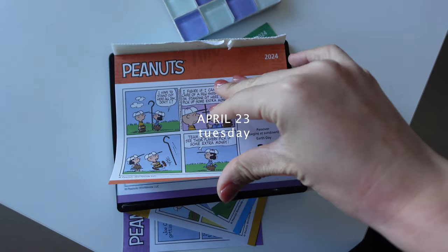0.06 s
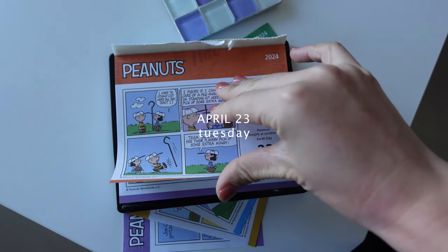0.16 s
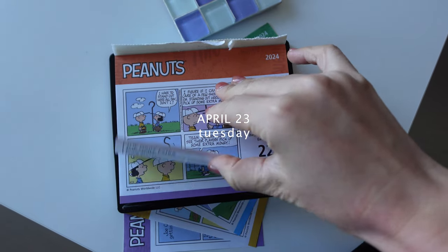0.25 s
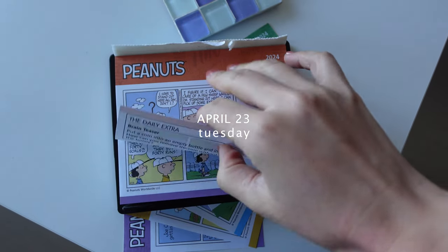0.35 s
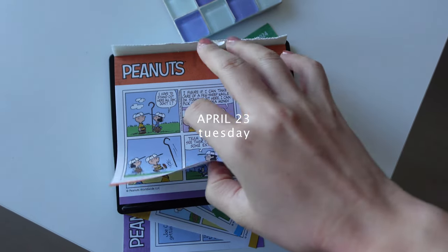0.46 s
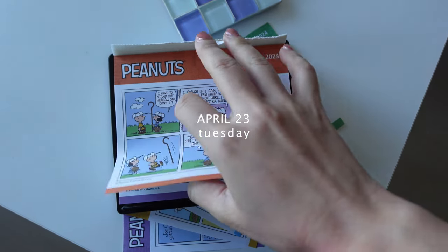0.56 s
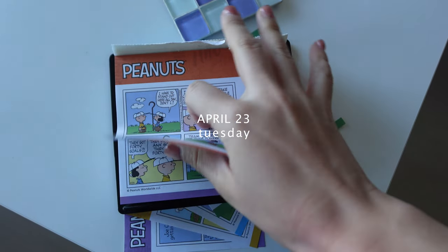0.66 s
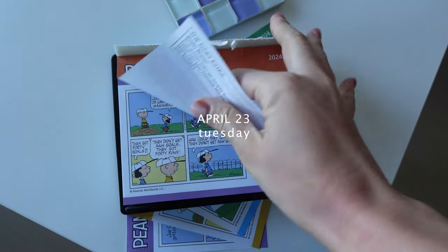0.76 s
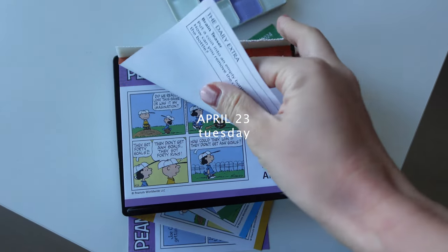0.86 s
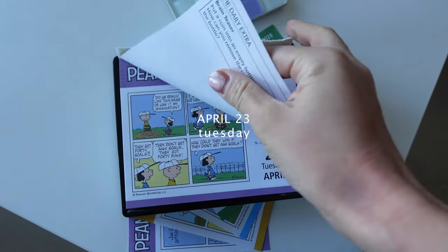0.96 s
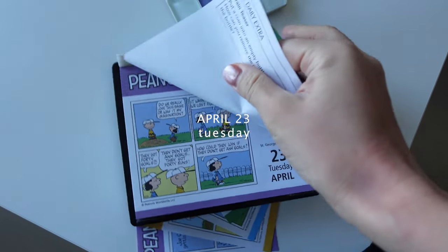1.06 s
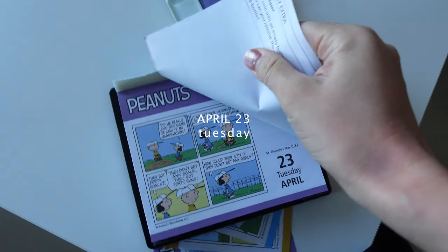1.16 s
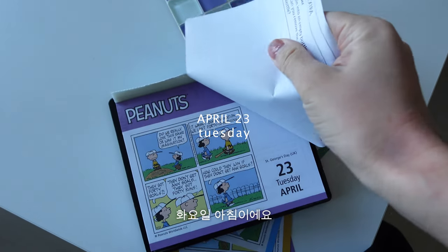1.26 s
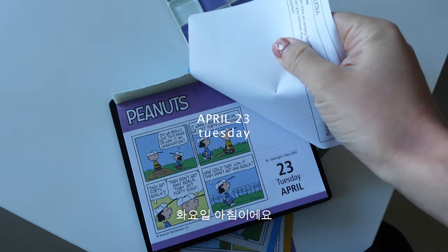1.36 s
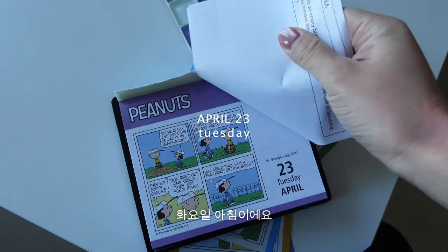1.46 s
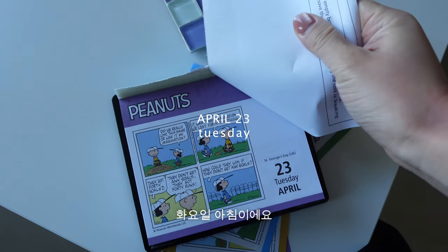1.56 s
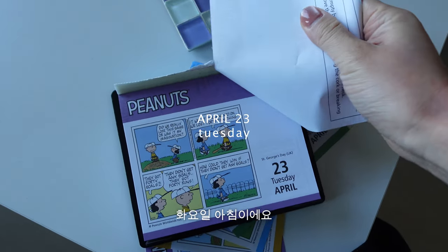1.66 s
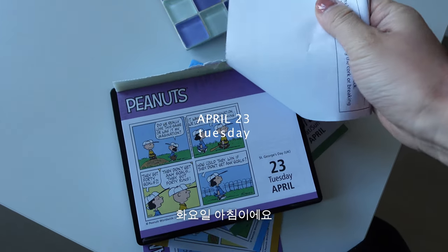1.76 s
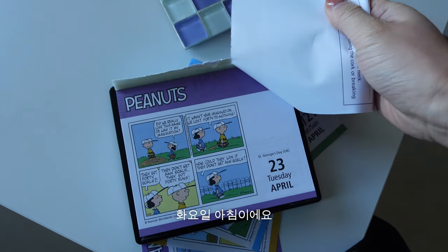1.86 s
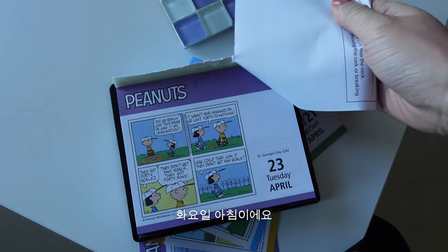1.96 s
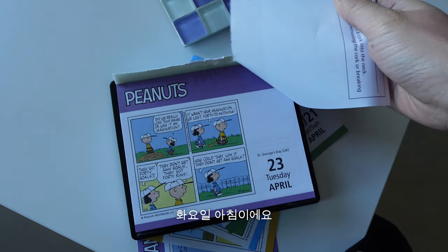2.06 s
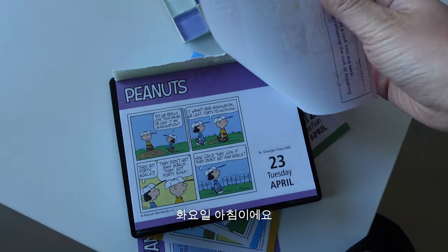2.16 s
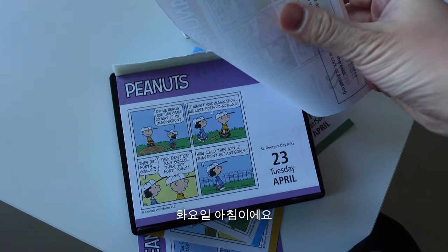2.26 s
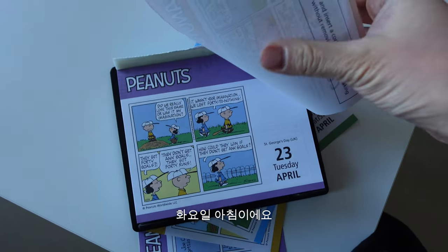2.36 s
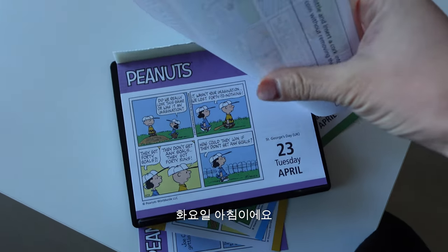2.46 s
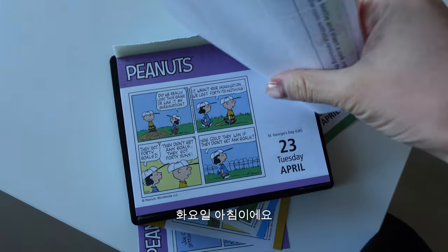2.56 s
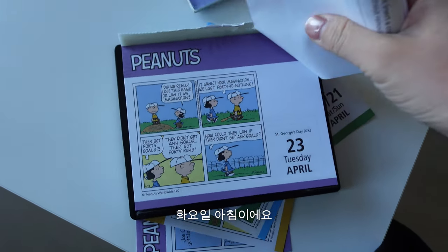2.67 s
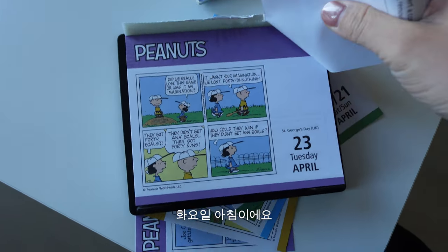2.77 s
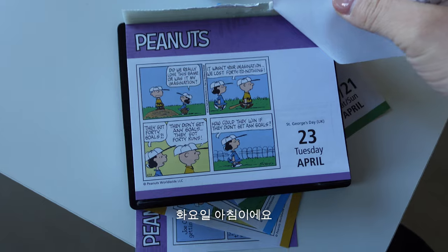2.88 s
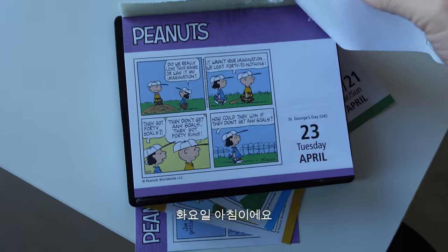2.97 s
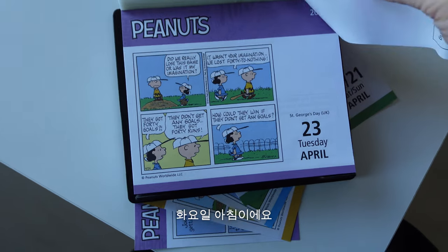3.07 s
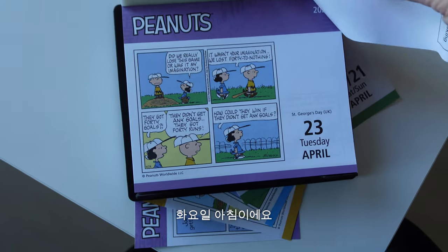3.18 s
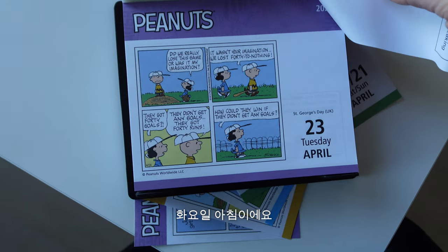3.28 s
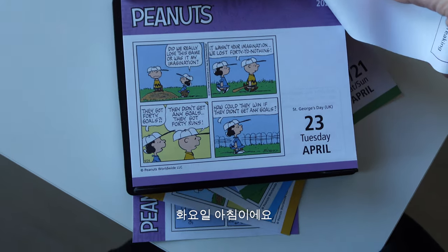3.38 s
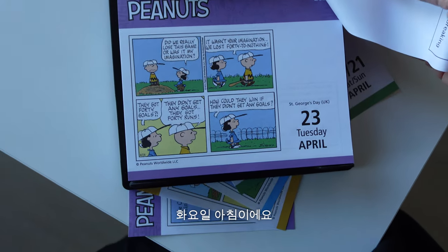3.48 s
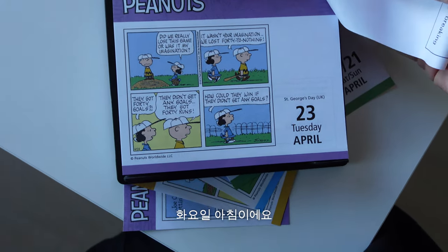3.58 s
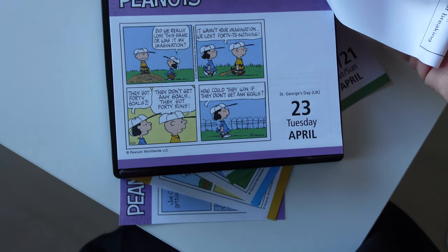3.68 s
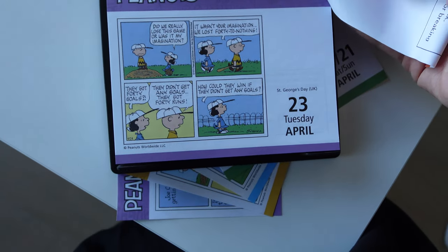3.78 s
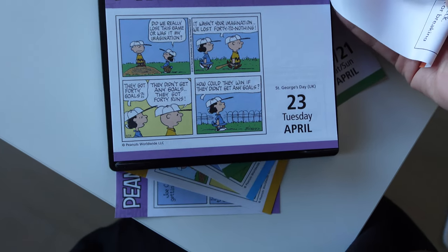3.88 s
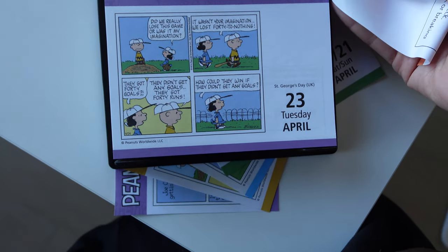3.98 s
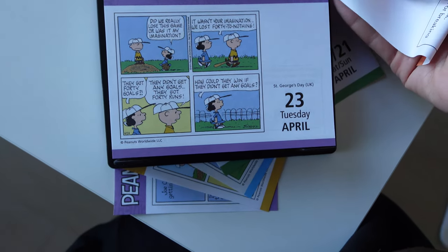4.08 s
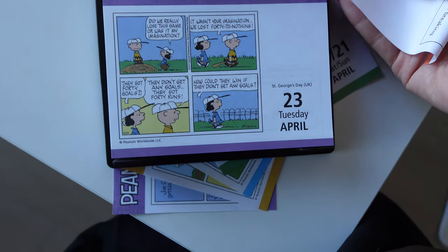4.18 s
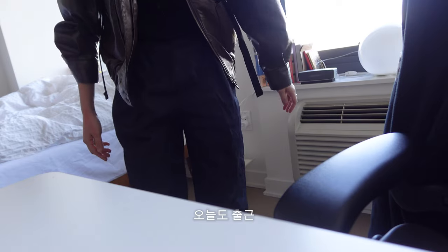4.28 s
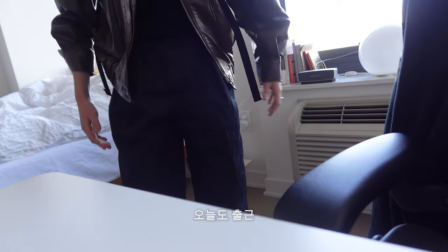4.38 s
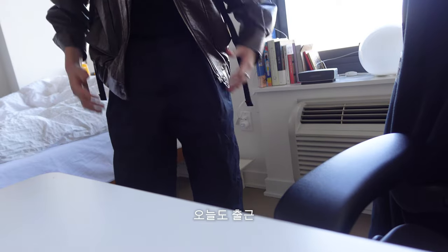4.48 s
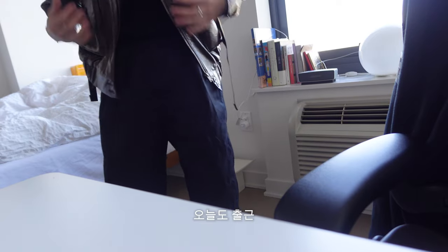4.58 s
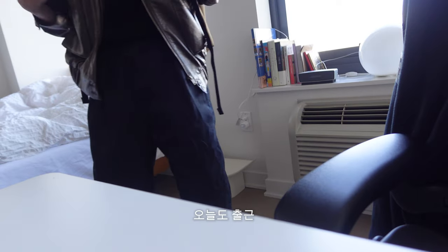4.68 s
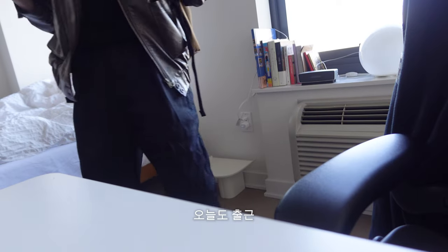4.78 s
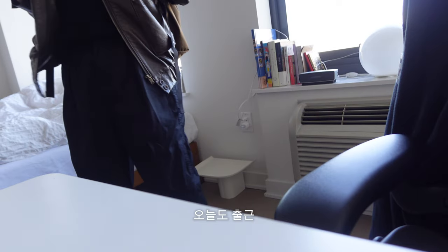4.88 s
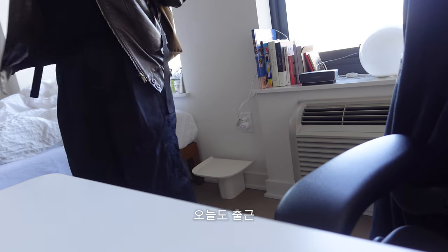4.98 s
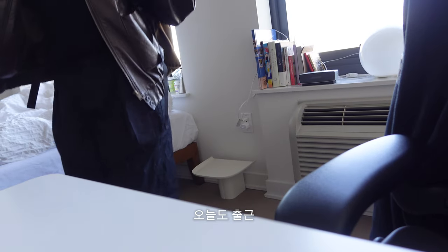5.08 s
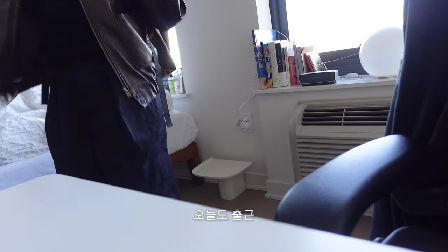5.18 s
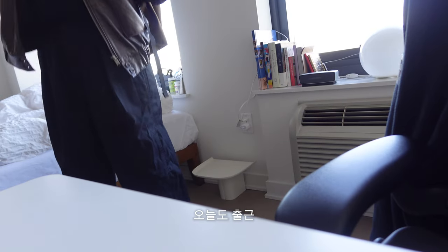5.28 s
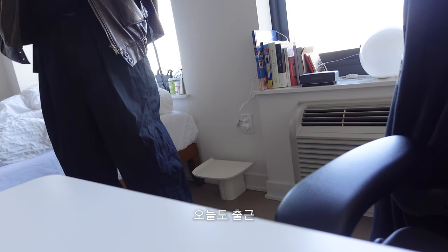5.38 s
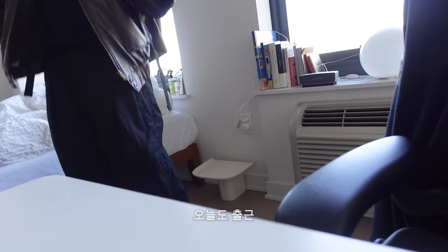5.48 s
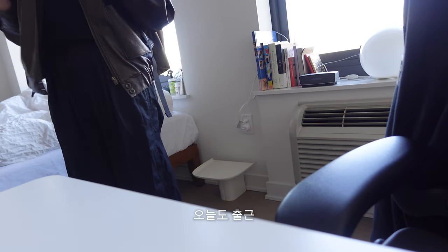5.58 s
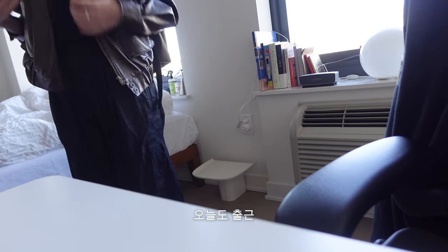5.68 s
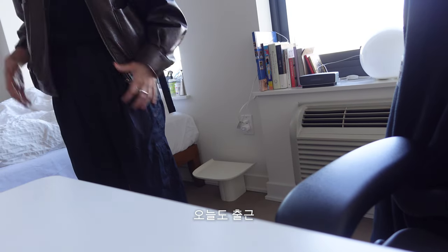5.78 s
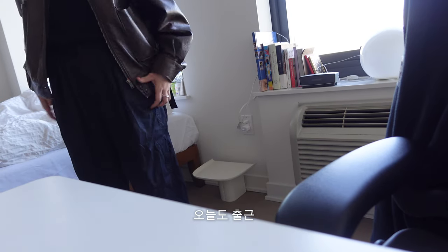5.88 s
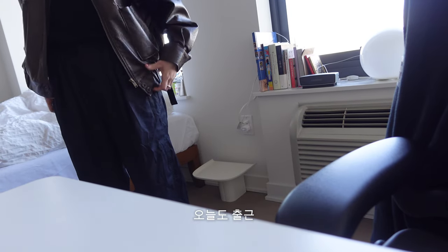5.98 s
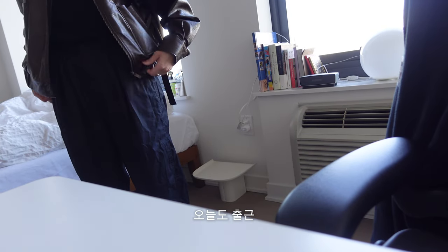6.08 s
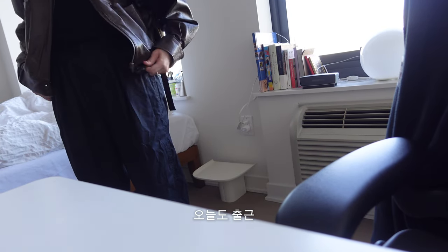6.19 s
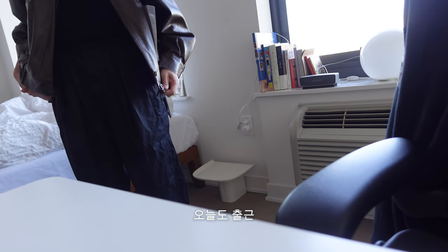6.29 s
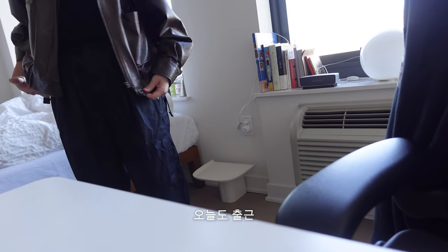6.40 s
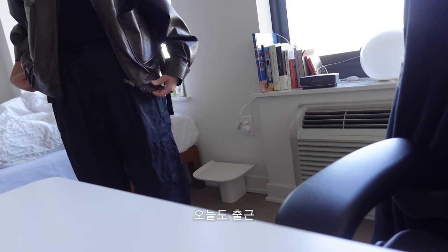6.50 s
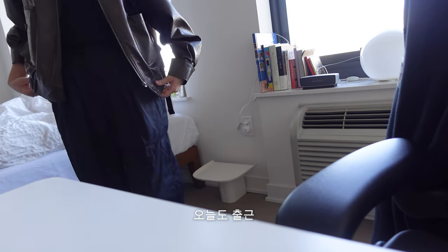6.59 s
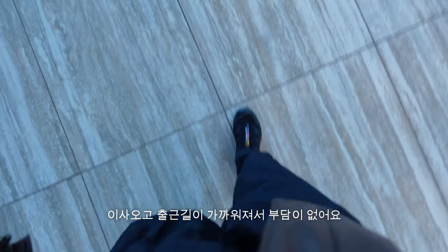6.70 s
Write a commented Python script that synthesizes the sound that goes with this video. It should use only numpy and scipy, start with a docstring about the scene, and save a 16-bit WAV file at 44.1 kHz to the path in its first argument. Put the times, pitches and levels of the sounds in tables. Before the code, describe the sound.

Very close and fairly dry, a paper page shifts softly from 0 s, with faint fingertip skids around 0.4-0.5 s. It buckles with a strong snap near 0.8 s, then tears off in a bright, grainy rip at about 1.1-1.3 s. Dense crinkles and papery pops follow from 1.5 to 2.1 s, more snaps around 2.6 and 2.9 s, then lighter rustling and crackle until two sharp, loud snaps at 4.2 s. At 4.25 s it cuts abruptly to a much quieter small room: a leather jacket rustles softly a few steps away, with small crease pops. Around 5.6 s it flaps once, with dull low bumps. Thin, high metallic zip-pull ticks come near 5.5 and 5.9 s and cluster at 6.2-6.5 s, with one more at 6.68 s. Faint air runs throughout. At 6.7 s a louder steady rush with a low tone and thin whistle suddenly begins.

```python
"""A page is lifted and torn off a desk calendar close by: the sheet buckles in snaps and slides as grainy noise,
fingertips skid, rubbed paper and tear hiss are band-passed friction, and fibres break in grainy rips.
Then, abruptly, farther off in a small room, someone shifts about in a leather jacket: it rustles, creases pop,
it flaps once amid dull bumps, and its zip pull ticks as clicked ringing modes.
At the very end a louder rush of noise with a low tone and a thin whistle sets in; faint air lies under it all."""
import sys
import numpy as np
from scipy import signal
from scipy.io import wavfile
from scipy.ndimage import uniform_filter1d, minimum_filter1d

SR = 44100
rng = np.random.default_rng(int(sys.argv[2]) if len(sys.argv) > 2 else 0)


def bounce(signal):
    """Save signal as a 16-bit WAV file at the path given by the first command-line argument."""
    frames = np.transpose(np.atleast_2d(signal))
    limited = np.clip(frames, -1, 1)
    pcm = np.round(limited * 32767).astype(np.int16)
    wavfile.write(sys.argv[1], SR, pcm)


N = 297234
TIME = np.arange(N) / SR
JACKET_START_S, RUSH_START_S = 4.252, 6.703


def from_db(db):
    """Decibels to gain."""
    return 10 ** (np.asarray(db) / 20)


def rms_one(x):
    """Scale to rms 1."""
    return x / np.sqrt(np.mean(x ** 2) + 1e-20)


def unit_energy(x):
    """Scale to a sum of squares of 1."""
    return x / np.sqrt(np.sum(x ** 2))


def in_time(rows):
    """Each column of a curve at every sample."""
    s, *columns = np.transpose(rows)
    return [np.interp(TIME, s, c) for c in columns]


def at_hz(points, hz):
    """Read a spectrum on a log-frequency axis."""
    points_hz, values = np.transpose(points)
    return np.interp(np.log(hz), np.log(points_hz), values)


def butter(x, hz, kind, order=2):
    """Causal Butterworth filter."""
    edges_hz = np.clip(hz, 10, .48 * SR)
    sos = signal.butter(order, edges_hz, kind, fs=SR, output="sos")
    return signal.sosfilt(sos, x + 1e-18)


def drift(rate_hz):
    """Smooth chance with spread near 1, a new random target rate_hz times a second."""
    knots = rng.standard_normal(4000)
    return np.interp(TIME * rate_hz, np.arange(len(knots)), knots) * np.sqrt(3 / 2)


def ring(x, hz, t60_s):
    """Damped resonator: a unit click sets a decaying sine of height 1 ringing."""
    r = from_db(-60 / (t60_s * SR))
    w = 2 * np.pi * hz / SR
    return signal.lfilter([0, np.sin(w)], [1, -2 * r * np.cos(w), r * r], x + 1e-18)


def add(out, s, sound):
    """Mix a short sound in at time s."""
    i = int(s * SR)
    out[..., i:i + sound.shape[-1]] += sound[..., :N - i]


def grain_envelope(per_s, spread_db, grain_s, grainy):
    """Tiny fractures at random, of uneven size, each dying fast, over a smooth share; rms near 1."""
    sizes = from_db(spread_db * np.minimum(rng.exponential(1, N), 3.5))
    hits = (rng.random(N) < per_s / SR) * sizes ** 2
    energy = signal.lfilter([1], [1, -np.exp(-2 / (grain_s * SR))], hits)
    share = np.clip(grainy, 0, 1)
    return np.sqrt(1 - share + share * energy / energy.mean())


def bands(spectrum, drive, patchy_db, patchy_hz):
    """Driven stereo noise as a list of (Hz, band); each band wanders in level; total rms 1."""
    # left-right correlation: (frequency [Hz], correlation [-1..1])
    likeness = [(100, 1), (500, 0.94), (2000, 0.97), (8000, 0.97), (16000, 0.97)]
    edges_hz = np.geomspace(25, 17000, 27)
    white = rng.standard_normal((2, 2, N)) * drive
    out = []
    for k, (low, high) in enumerate(zip(edges_hz, edges_hz[1:])):
        hz = np.sqrt(low * high)
        if high < spectrum[0][0] or low > spectrum[-1][0]:
            continue
        mid, side = butter(white[k % 2], [low, high], "band")
        alike = np.clip(at_hz(likeness, hz), 0, 1)
        gain = from_db(at_hz(spectrum, hz) + patchy_db * drift(patchy_hz))
        stereo = np.sqrt(1 + alike) * mid + np.sqrt(1 - alike) * side * [[1], [-1]]
        out.append((hz, gain * stereo))
    total = np.sqrt(sum(np.mean(band ** 2) for hz, band in out))
    return [(hz, band / total) for hz, band in out]


def steady(spectrum):
    """Even noise of one colour; rms 1."""
    return sum(band for hz, band in bands(spectrum, 1, 0, 1))


def swells(rows):
    """Each move rises at 20 dB per attack, holds, sinks at 20 dB per release: dB of body, middle, top."""
    power = np.full((3, N), 1e-12)
    for s, attack_s, hold_s, release_s, db, body_db, top_db in rows:
        away = np.maximum(s - TIME, 0) / attack_s + np.maximum(TIME - s - hold_s, 0) / release_s
        shape = from_db(db - 20 * np.minimum(away, 10))
        power += np.outer(from_db([body_db, 0, top_db]) ** 2, shape ** 2)
    return 10 * np.log10(power)


def rustle(levels_db, spectrum, drive, patchy_db, patchy_hz):
    """Grainy friction noise whose body, middle and top swell as the surface bends."""
    body_db, middle_db, top_db = levels_db
    parts = bands(spectrum, drive, patchy_db, patchy_hz)
    swell_db = []
    for low, high, db in ((0, 2000, body_db), (2000, 7000, middle_db), (7000, SR, top_db)):
        power = sum(np.mean(band ** 2) for hz, band in parts if low <= hz < high)
        swell_db.append(db - 10 * np.log10(power))
    swell_db = np.array(swell_db)
    centres = np.log([1400, 3500, 9500])

    def blend(hz):
        """Crossfade weights of the three ranges."""
        return np.array([np.interp(np.log(hz), centres, w) for w in np.eye(3)])

    return sum(band * from_db(blend(hz) @ swell_db) for hz, band in parts)


def buckles(rows, ring_cycles, crack_s, after_s, pop_db, crack_db, after_db, low_cut_hz):
    """A fold flips: a damped pop, a bright crack and a short crackle as the sheet settles."""
    out, t = np.zeros((2, N)), np.arange(SR // 16) / SR
    pop_samples, settle_samples = SR / 400, SR / 200
    for s, db, hz, crack, after in rows:
        noise = rng.standard_normal((4, len(t)))
        flip = (t == 0) + .06 * noise[3] * np.exp(-t / .0009)
        pitches = hz * np.array([.66, .98, 1.38]) * np.exp(rng.normal(0, .05, 3))
        modes = sum((-1) ** k * ring(flip, f, ring_cycles / f) for k, f in enumerate(pitches))
        # small folds radiate no bass
        pop = unit_energy(butter(modes, max(low_cut_hz, 0.22 * hz), "high", order=4))
        snap = unit_energy(butter(noise[0] * np.exp(-t / crack_s), [4800, 10500], "band"))
        crackle = noise[1:3] * (1 - np.exp(-t / 0.0014)) * np.exp(-t / after_s)
        settle = butter(crackle, [hz * 0.42, hz * 1.38], "band", order=1)
        mid, side = map(unit_energy, butter(settle, low_cut_hz, "high", order=4))
        direct = np.sqrt(pop_samples) * (from_db(pop_db) * pop + from_db(crack + crack_db) * snap)
        spread = mid + 0.19 * side * [[1], [-1]]
        tail = np.sqrt(settle_samples) * from_db(after + after_db) * spread
        add(out, s, from_db(db) * (direct + tail))
    return out


def room(x, t60_s, dull_hz):
    """Diffuse reflections, different at each ear, after a short gap."""
    t = np.arange(SR // 2) / SR
    noise = rng.standard_normal((2, len(t))) * from_db(-60 * t / t60_s) * (t > .004)
    tail = butter(noise, dull_hz, "low", order=1)
    return signal.fftconvolve(x, tail / np.sqrt(np.sum(tail ** 2) / 2), axes=1)[:, :N]


def air():
    """Faint steady noise of the room air."""
    # spectrum: (frequency [Hz], relative density [dB per Hz])
    air_spectrum = [(15, -63), (25, -55), (97, -21), (149, -19), (206, -7.5), (293, -3.5), (373, 0),
                    (560, -33), (818, -13), (1230, -10), (2110, -6.5), (4490, -9), (6920, -17.5),
                    (14000, -16.5), (16000, -15)]
    return from_db(-58.0) * steady(air_spectrum)


def small_snaps(slide_db, crispness, count=200):
    """Little folds flip at random, oftener in a crisp sheet and louder in a brisk slide."""
    per_s = 43  # in a fully crisp sheet
    chance, scatter = rng.random((count, 2)), rng.standard_normal((count, 2))
    rows = []
    for (when, luck), (size, pitch) in zip(chance, scatter):
        i = int(when * JACKET_START_S * SR)
        if luck < per_s * crispness[i] * JACKET_START_S / count:
            db = slide_db[i] + 1 + 3.5 * size
            hz = 5000 * 2 ** (0.18 * pitch)
            rows.append((i / SR, db, hz, 2))
    return rows


def with_cracks(rows):
    """A smaller, higher fold cracks more brightly: crack level rises with pitch."""
    fold_hz, crack_db, crack_db_per_octave = 3000, -11.5, 15
    return [(s, db, hz, crack_db + crack_db_per_octave * np.log2(hz / fold_hz), after)
            for s, db, hz, after in rows]


def snaps(slide_db, crispness):
    """The sheet's big folds and chance small ones flip over and snap."""
    # big buckles: (time [s], level [dB], pitch [Hz], relative after-crackle [dB])
    big_snaps = [(.098, -32, 4000, -6), (0.306, -31, 3000, -3), (.669, -19.5, 3170, 0),
                 (.736, -29.5, 3720, -12), (.771, -11, 3740, -3), (1.101, -16, 3660, 4),
                 (1.302, -27, 4800, -13), (1.43, -30.5, 3830, -4), (1.538, -21, 4300, -9),
                 (1.585, -15, 4400, 1), (1.606, -15.5, 2430, -22), (1.624, -17.5, 2330, -13),
                 (1.74, -16, 2470, -4), (1.75, -23, 3100, 7), (1.773, -24, 2200, -8),
                 (1.82, -16, 3600, -14), (1.842, -15, 2120, -2), (1.908, -18, 2600, -14),
                 (1.917, -18, 1920, -24), (1.926, -14, 2020, -14), (1.951, -14, 1980, -17),
                 (1.966, -14.5, 1920, -30), (1.976, -34.5, 4200, 13), (2.023, -20, 2230, -4),
                 (2.329, -23.5, 3100, 4.5), (2.562, -12, 3150, -3.5), (2.586, -19, 2400, -19),
                 (2.619, -17, 2950, 1), (2.639, -19, 2670, -4), (2.678, -22.5, 4300, 2),
                 (2.869, -29, 2860, -18), (2.882, -16.5, 3160, -11), (2.931, -17, 2740, -5),
                 (2.966, -14.5, 3300, 3), (2.981, -24, 3500, 5), (2.989, -22, 2300, -10),
                 (3.22, -24.5, 4300, -1.5), (3.229, -26.5, 3740, -14), (3.489, -28, 4600, 9),
                 (3.525, -25.5, 5000, -3), (3.567, -28.5, 4930, 2), (3.598, -23, 4660, -2.5),
                 (3.637, -31.5, 3260, 11), (3.656, -29.5, 3800, -14), (3.741, -28, 3140, -14),
                 (3.778, -28, 4130, 2), (3.837, -28, 3470, -1), (3.919, -28, 2900, 4),
                 (4.011, -21.5, 3500, 0.5), (4.06, -21, 4300, -1), (4.126, -29, 3700, 5.5),
                 (4.157, -32, 4150, 0), (4.193, -7, 3610, -9), (4.204, -8.5, 2830, -3)]
    folds = with_cracks(big_snaps + small_snaps(slide_db, crispness))
    return buckles(folds, ring_cycles=7.5, crack_s=.001, after_s=0.004,
                   pop_db=-1.2, crack_db=3.5, after_db=-6.0, low_cut_hz=1200)


def sheet_slide(sliding_db, crispness):
    """Sliding paper: friction noise, grainier where the sheet is crisp."""
    # spectrum: (frequency [Hz], relative density [dB per Hz])
    paper_spectrum = [(120, -63), (200, -40.5), (373, -14.5), (465, -26), (709, -50), (883, -9.5),
                      (1370, 4), (2130, -7.5), (2610, -2), (3070, -5.5), (3490, -4), (5630, -7.5),
                      (11100, -13), (15100, -19.5), (16000, -24)]
    crinkle = grain_envelope(per_s=350, spread_db=2.5, grain_s=0.0017, grainy=crispness)
    return rustle(sliding_db, paper_spectrum, crinkle, patchy_db=2.5, patchy_hz=40)


def strokes(rows, drive, release_s, patchy_db):
    """Short bursts of paper noise: each starts at once, holds and dies away with its own brightness."""
    # spectrum: (frequency [Hz], relative density [dB per Hz])
    tear_spectrum = [(120, -64), (200, -36), (373, -14), (456, -22), (735, -35), (883, -3.5), (1480, 8.5),
                     (1980, -7.5), (2290, 3.5), (3560, 4), (6880, 4), (9750, 3.5), (13100, -0.5),
                     (15100, -7), (16000, -19)]
    level, tilt = np.zeros(N), np.zeros(N)
    for start, end, db, slope_db in rows:
        rise = np.clip((TIME - start) / 0.0029, 0, 1)
        shape = rise * np.exp(-np.maximum(TIME - end, 0) / release_s)
        level = np.maximum(level, from_db(db) * shape)
        tilt[TIME >= start] = slope_db
    noise = 0
    for hz, band in bands(tear_spectrum, drive, patchy_db, 150):
        octaves = np.log2(max(hz, 1500) / 5000)
        noise = noise + band * from_db(tilt * octaves)
    return level * noise


def finger_skids(friction):
    """Fingertips skid over the page: bursts of grainy friction without bass."""
    # skids: (start [s], end [s], level [dB], brightness [dB per octave])
    skid_rows = [(.359, .368, -35.5, -2.5), (.368, .425, -39, -1), (.468, .488, -31, 2.5),
                 (.487, .514, -26, -2)]
    return butter(strokes(skid_rows, friction, release_s=.015, patchy_db=4.0), 2300, "high")


def coloured_friction(drive, edge_s):
    """Friction coloured by one broad band per row: rubbed or flexing paper, and crisp hiss in the tear."""
    # bands of friction: (start [s], end [s], centre [Hz], width [Hz], level [dB])
    friction_rows = [(0.359, 0.425, 2640, 700, -38), (.470, 0.517, 2400, 800, -31),
                     (0.686, 0.728, 990, 324, -39.5), (1.103, 1.195, 9150, 2580, -23),
                     (1.12, 1.18, 3230, 1200, -27), (1.209, 1.317, 990, 295, -35),
                     (1.733, 1.786, 1410, 587, -28.5), (2.067, 2.096, 1340, 640, -33.5),
                     (3.156, 3.720, 1110, 316, -48), (3.81, 3.88, 1840, 500, -32),
                     (3.987, 4.053, 1390, 230, -34)]
    out = np.zeros(N)
    for start, end, hz, width_hz, db in friction_rows:
        held = np.clip(np.minimum(TIME - start, end + edge_s - TIME) / edge_s, 0, 1)
        edges_hz = [hz - width_hz / 2, hz + width_hz / 2]
        hiss = butter(rng.standard_normal(N) * drive, edges_hz, "band")
        out += from_db(db) * held * rms_one(hiss)
    return out


def rips_and_bright_skids():
    """Short grainy bursts: fibres breaking in the tear, then brief bright skids of the paper."""
    # bursts, bright skids among the rips: (start [s], end [s], level [dB], brightness [dB per octave])
    burst_rows = [(1.094, 1.101, -26, 2), (1.101, 1.141, -22.5, .2), (1.147, 1.272, -21.5, 1.5),
                  (1.272, 1.311, -24, 1.3), (1.531, 1.556, -18.5, 0), (1.583, 1.601, -21, -1),
                  (1.748, 1.763, -24, 1), (1.775, 1.784, -17.5, -4.5), (1.889, 1.914, -27, 0),
                  (1.939, 1.947, -27.5, 5.5), (2.028, 2.047, -33.5, 8), (2.114, 2.134, -25.5, 1),
                  (2.643, 2.683, -31.5, 6), (2.966, 2.973, -28, -9)]
    grains = grain_envelope(per_s=480, spread_db=2.2, grain_s=.002, grainy=.72)
    return strokes(burst_rows, grains, release_s=0.0021, patchy_db=3.0)


def page():
    """Snaps, slides, skids, coloured friction and rips of the sheet, close by in a little reverberation."""
    # crispness of the slide: (time [s], grainy share [0-1])
    crisp_curve = [(.55, 0.03), (1.5, .2), (1.85, 0.67), (2.2, 0.4), (2.5, 0.42), (3.1, 0.33), (3.35, 0.92),
                   (4.2, 0.66)]
    # slides and bends: (arrival [s], attack [s], hold [s], release [s], level [dB],
    # body above level [dB], top above level [dB])
    slide_rows = [(.10, 0.023, 0.0057, 0.091, -45.5, -21, -5.5), (.30, 0.07, 0.017, 0.2, -49.5, -13, -3.5),
                  (.472, 0.0096, 0.081, 0.12, -31.5, -18.5, -8),
                  (.66, 0.087, 0.029, 0.098, -29.5, -14.5, -6.5),
                  (.775, 0.017, .005, 0.14, -32.5, -5.5, -6), (.885, 0.08, .02, 0.12, -34.5, -28, -7.5),
                  (.985, 0.014, 0.014, 0.072, -41, -9.5, -2.5), (1.11, 0.035, 0.11, 0.24, -22, -9, -18),
                  (1.27, 0.14, .02, 0.083, -29.5, -10.5, 5), (1.35, 0.072, 0.011, 0.024, -42.5, 6, 12),
                  (1.41, 0.041, 0.048, .1, -51, 3, 5), (1.54, 0.056, 0.075, 0.17, -27, -6.5, -3.5),
                  (1.745, 0.049, 0.18, 0.2, -32, -0.5, -7), (2.03, 0.011, 0.0074, 0.19, -33.5, -13, -4),
                  (2.125, 0.015, 0.0092, 0.2, -38, -1.5, 0), (2.25, .14, 0.32, .1, -42.5, -15, 3),
                  (2.565, 0.0059, 0.032, 0.24, -30, -3, -23), (2.66, 0.14, 0.0097, 0.14, -30.5, -9, 3),
                  (2.795, 0.084, .005, 0.089, -36, -3.5, -6), (2.975, 0.095, .01, .25, -29, -5.5, -12.5),
                  (3.06, 0.16, 0.19, 0.15, -33.5, -10, -11), (3.44, 0.17, 0.262, 0.05, -39.5, -11, -0.5),
                  (3.78, 0.14, 0.011, .08, -33, -5.5, -2.5), (3.825, 0.1, 0.041, 0.15, -27, -10, -2),
                  (3.92, .04, 0.012, 0.086, -28, -5.5, -6), (4.01, 0.08, 0.084, 0.19, -31, -13, -7),
                  (4.2, 0.079, 0.034, .05, -29, -12, -11)]
    crispness, = in_time(crisp_curve)
    sliding_db = swells(slide_rows)
    friction = grain_envelope(per_s=1400, spread_db=1.2, grain_s=.0009, grainy=.45)
    near = snaps(sliding_db[1], crispness) + sheet_slide(sliding_db, crispness)
    near = near + finger_skids(friction) + coloured_friction(friction, edge_s=0.003)
    near = near + rips_and_bright_skids()
    return near + from_db(-21.5) * room(near, t60_s=0.74, dull_hz=6070)


def room_drone():
    """Very faint low noise under the jacket."""
    # spectrum: (frequency [Hz], relative density [dB per Hz])
    drone_spectrum = [(35, -65), (60, -37), (156, -29), (211, 2), (296, -24), (350, 1), (419, -23),
                      (554, -34), (650, -13), (840, -53), (1430, -120)]
    return from_db(-81.5) * steady(drone_spectrum)


def leather_rub():
    """Leather rubs as the wearer turns: noise lightly broken into grains."""
    # moves: (arrival [s], attack [s], hold [s], release [s], level [dB],
    # body above level [dB], top above level [dB])
    shift_rows = [(4.56, .7, 0.014, 1, -40.5, -10.5, -2), (4.83, 0.09, 0.21, 0.25, -40, -9, -1),
                  (5.075, 0.063, 0.018, 0.18, -35, -15.5, -6), (5.15, 0.11, .36, 0.18, -37.5, -6, -1),
                  (5.6, 0.074, 0.01, 0.38, -25.5, -2.5, -3), (5.9, 0.078, 0.094, 0.48, -40, -8, 1),
                  (6.35, 0.45, 0.011, 0.48, -39.5, -3.5, 4.5)]
    # spectrum: (frequency [Hz], relative density [dB per Hz])
    leather_spectrum = [(240, -30), (400, 4.5), (474, -4.5), (562, -33.5), (1090, 11.5), (1230, 6.5),
                        (1730, 6.5), (2470, 4.5), (3420, 3), (5520, -4), (10400, -12), (12300, -13),
                        (16000, -17)]
    creak = grain_envelope(per_s=410, spread_db=3.5, grain_s=0.0011, grainy=0.059)
    return rustle(swells(shift_rows), leather_spectrum, creak, patchy_db=1.93, patchy_hz=43)


def creases():
    """Creases in the leather pop, ringing longer than paper folds."""
    # creases: (time [s], level [dB], pitch [Hz], relative crack [dB], relative after-crackle [dB])
    crease_rows = [(4.550, -32.5, 1520, -2.5, -6), (4.821, -27, 2800, -2, 3), (5.020, -32, 3300, -14, -2),
                   (5.077, -24, 1930, -7, -17), (5.086, -25, 3130, -17, 1), (5.590, -21, 1940, 0, -16),
                   (5.615, -24, 1040, -0.5, 6.5), (5.630, -11, 1980, -17, -18), (5.661, -33, 1980, 10, -13),
                   (5.717, -15.5, 3140, -30, -15)]
    return buckles(crease_rows, ring_cycles=21.0, crack_s=0.0018, after_s=0.017,
                   pop_db=-6.5, crack_db=-3.0, after_db=-3.3, low_cut_hz=820)


def bumps():
    """Dull bumps of the moving body stir the low modes of the room, each with its own tilt."""
    # bumps: (time [s], level [dB], tilt towards the higher modes [dB per octave])
    bump_rows = [(5.17, -48.5, 11), (5.235, -46, 0.5), (5.592, -47, 4), (5.621, -26.5, 1.5),
                 (5.680, -29, -7), (5.755, -43, 4)]
    # low room modes: (frequency [Hz], relative level [dB], t60 [s])
    boom_modes = [(210.3, -6.5, 0.21), (230, -3, 0.19), (265, -19, .14), (346, -9, 0.21), (397, -20, 0.16),
                  (449, 1, 0.21), (500, -15, 0.11)]
    out, t = np.zeros(N), np.arange(SR // 2) / SR
    for s, db, tilt_db in bump_rows:
        pushes = rng.standard_normal((len(boom_modes), len(t))) * np.exp(-t / 0.013)
        for push, (hz, mode_db, t60_s) in zip(pushes, boom_modes):
            boom = ring(push, hz, t60_s)
            octaves = np.log2(hz / 320)
            add(out, s, from_db(db + mode_db + tilt_db * octaves) * boom / np.abs(boom).max())
    return butter(out, 210, "high", order=4)


def zip_pull():
    """The small metal tab taps its slider: a sharp tick and a thin ring."""
    # taps: (time [s], level [dB])
    tap_rows = [(5.527, -22), (5.902, -16), (5.936, -18), (6.1941, -20.5), (6.2546, -25), (6.3367, -13),
                (6.3667, -9), (6.3995, -20), (6.4433, -18.5), (6.4666, -12), (6.6817, -16)]
    # modes of the tab: (frequency [Hz], relative level [dB], t60 [s])
    zip_modes = [(7200, -42, 0.016), (8900, -14, 0.0078), (12100, -7, 0.021), (12700, -15.5, 0.012),
                 (14300, -13, .012)]
    out, t = np.zeros(N), np.arange(SR // 8) / SR
    click = 1.0 * (t == 0)
    for s, db in tap_rows:
        burst = rng.standard_normal(len(t)) * np.exp(-t / 0.00052)
        tick = butter(burst, 2300, "high", order=4) * from_db(-8)
        rings = sum(ring(click, hz, t60_s) * from_db(mode_db + rng.normal(0, 2.5))
                    for hz, mode_db, t60_s in zip_modes)
        add(out, s, from_db(db) * (tick + rings))
    return butter(out, 1000, "high")


def jacket():
    """Leather, bumps and zip pull a few steps away, with more of the room in them."""
    far = leather_rub() + creases() + bumps() + zip_pull()
    return far + from_db(-13) * room(far, t60_s=0.49, dull_hz=7600) + room_drone()


def rush():
    """A broad noise rush with a low tone and a thin whistle, both steady sines."""
    # spectrum: (frequency [Hz], relative density [dB per Hz])
    rush_spectrum = [(47, -68), (80, -26), (200, -19), (290, 5), (410, 4.5), (672, -12), (839, -1.5),
                     (2180, -5), (2600, -7), (2840, -6), (6450, -14), (8410, -17), (16000, -25)]
    # tones: (frequency [Hz], rms level [dB])
    tone_rows = [(420, -44), (2606, -37)]
    tones = sum(np.sqrt(2) * from_db(db) * np.sin(2 * np.pi * hz * TIME) for hz, db in tone_rows)
    return from_db(-32.5) * steady(rush_spectrum) + tones


def scene():
    """Page gives way to jacket abruptly, the rush joins at the end; faint air throughout."""
    # balance: (time [s], left minus right [dB])
    pan_curve = [(0.0, 0), (2.61, -1.0), (4.03, -2.0), (4.38, -0.5), (4.48, 0.5), (5.75, 0.5), (6.19, 0.5),
                 (6.7, 2)]
    pan_db, = in_time(pan_curve)
    action = np.where(TIME < JACKET_START_S, page(), jacket()) + rush() * (TIME >= RUSH_START_S)
    return action * from_db(pan_db * [[.5], [-.5]]) + air()


def record(dry):
    """A fast limiter holds down the sharpest peaks; the top is cut above 16 kHz."""
    ceiling, hold_samples = .66, SR // 300
    gain = np.minimum(1, ceiling / (np.abs(dry).max(axis=0) + 1e-9))
    gain = uniform_filter1d(minimum_filter1d(gain, hold_samples), hold_samples)
    top_cut = signal.ellip(12, .1, 80, 16000, fs=SR, output="sos")
    return signal.sosfilt(top_cut, dry * gain)


dry = scene()
out = record(dry)
bounce(out)
```